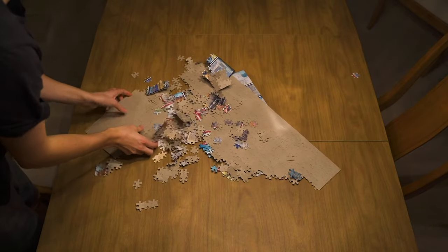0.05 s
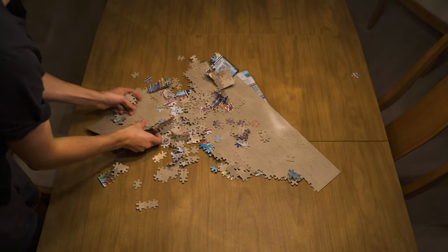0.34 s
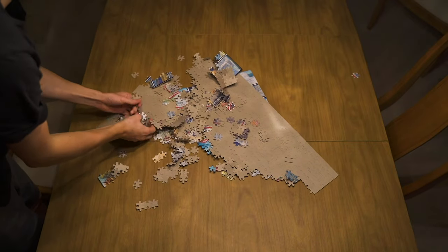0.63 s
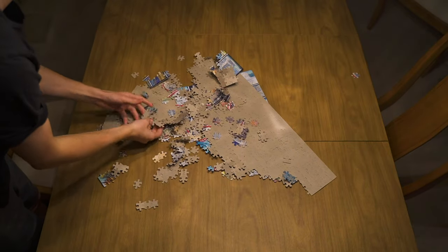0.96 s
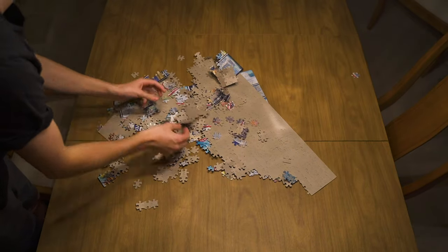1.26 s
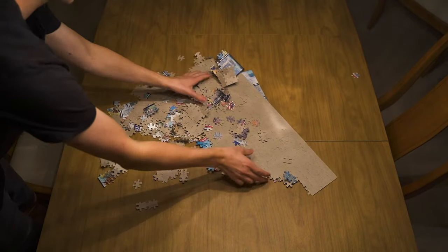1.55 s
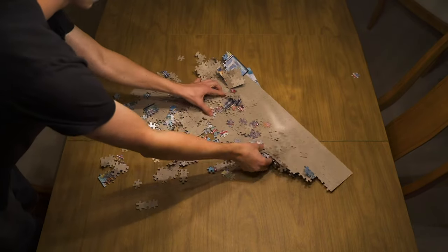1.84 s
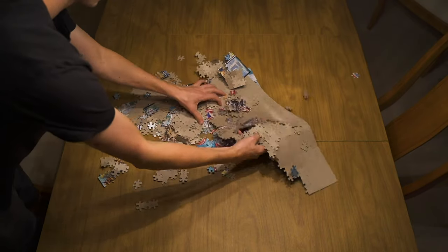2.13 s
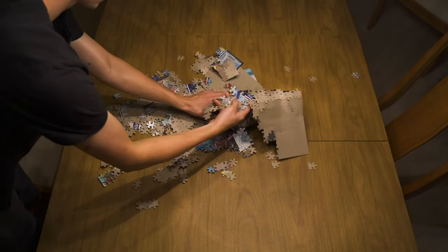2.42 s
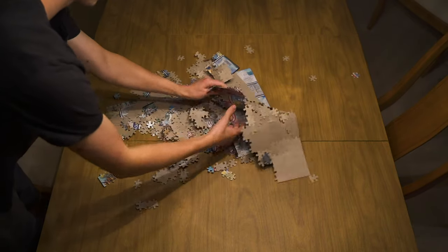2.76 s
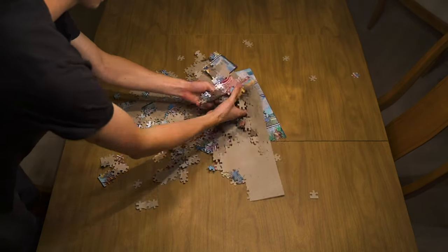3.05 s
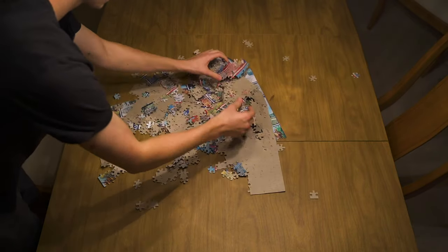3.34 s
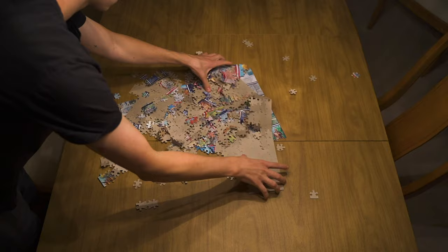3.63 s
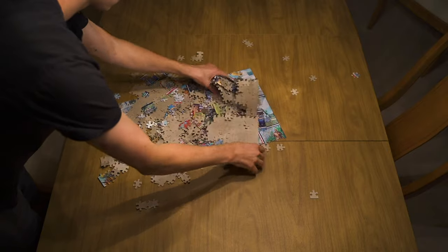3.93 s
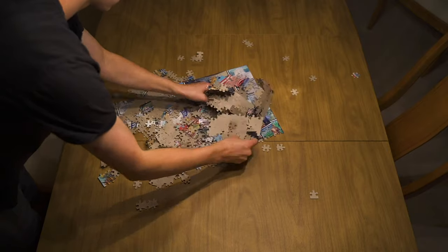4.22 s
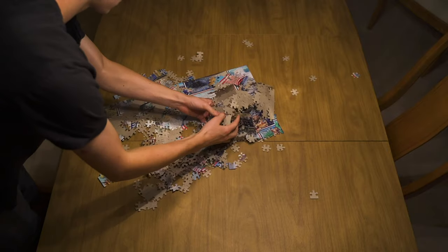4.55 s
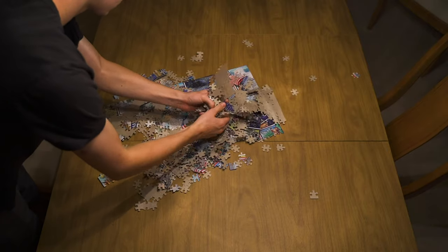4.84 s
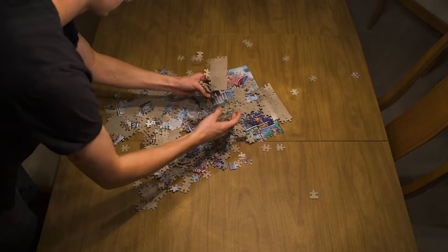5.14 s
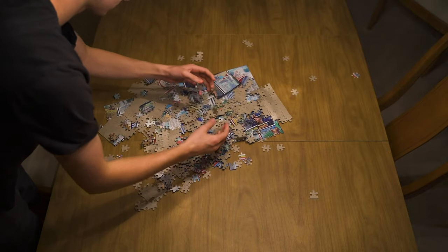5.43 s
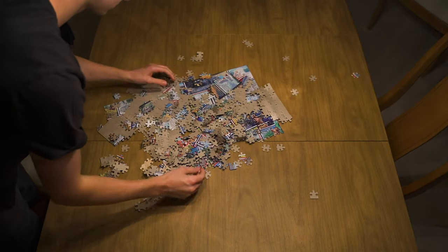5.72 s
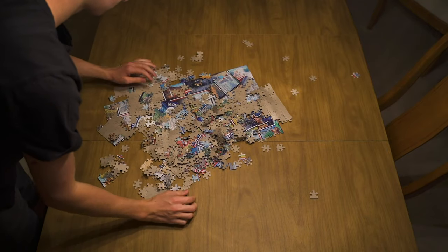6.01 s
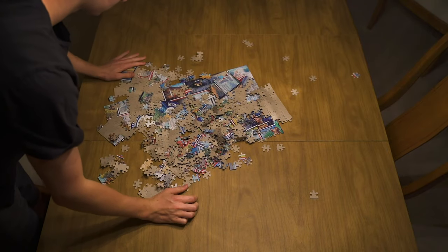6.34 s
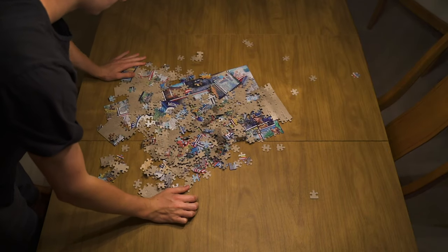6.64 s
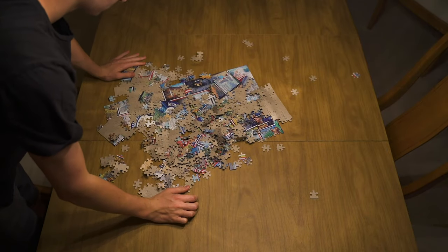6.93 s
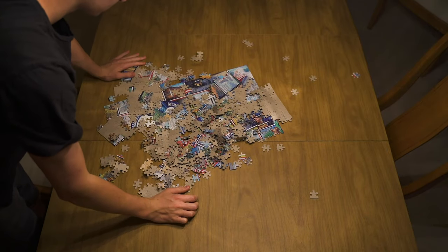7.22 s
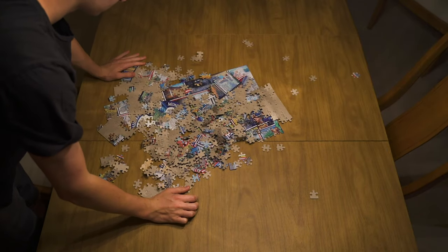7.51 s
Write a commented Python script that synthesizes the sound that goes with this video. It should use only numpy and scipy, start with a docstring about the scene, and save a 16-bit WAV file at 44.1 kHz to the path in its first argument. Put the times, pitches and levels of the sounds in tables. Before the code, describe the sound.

Hands break up a cardboard jigsaw on a wooden table, heard close in a small, live room with faint steady air. From the start, slabs drag over the wood in short bursts while loose pieces rustle and click, with a sharper clack at about 1.1 seconds. After a brief easing around 1.6 seconds, the handling grows dense and louder. Sections crumble, joints snap and pieces rattle down, with a slab flopping at 2.5 seconds and a strong crumbling clatter near 2.9. A sharp clack and thud land at 3.6 seconds, followed by more shoving, scraping and another flop around 4.3. The table booms softly under the hands. Bright rustling and clacks continue until about 5.7 seconds, and a last short rattle comes just after 6. A small hollow knock follows at 6.6 seconds, then a few soft finger taps around 7, leaving only room air.

```python
"""Cardboard drags, clatters and rustles on wood: two hands break up a finished jigsaw in a small, live room.
Shoved slabs judder over the table, loose pieces clack and chink, cut edges scrape: swarms of tiny contacts.
Pieces land, slabs crumble and flop, joints snap: each a blow and a short rattle, coloured by the table top.
The table booms softly under the hands, which come to rest with a few soft taps. Faint room air throughout."""
import sys
import numpy as np
from scipy import signal
from scipy.fft import rfft, irfft, next_fast_len
from scipy.io import wavfile
from scipy.ndimage import map_coordinates

SR = 44100
rng = np.random.default_rng(int(sys.argv[2]) if len(sys.argv) > 2 else 0)


def int16_out(signal):
    """Quantize to a 16-bit WAV file."""
    q = np.round(np.clip(np.atleast_2d(signal).T, -1, 1) * 32767)
    wavfile.write(sys.argv[1], SR, q.astype(np.int16))


N = 333989

# spectra of struck wood, cut edges and cardboard: f/Hz, level/dB
WOOD_SPECTRUM = [(30, -49), (160, -30), (220, -11.5), (310, -10), (380, -3), (520, 0.5), (750, -7),
                 (1100, -6.5), (2000, -14), (5000, -49.5)]
EDGE_SPECTRUM = [(500, -60), (1800, -7), (2800, -4), (4200, -6), (5300, 0), (7000, -4.5), (8500, -6.5),
                 (10500, -6), (12500, -9.5), (16000, -10.5)]
CARD_SPECTRUM = [(60, -25), (160, -21.5), (330, -8.5), (800, -3), (2000, 6), (2800, 7), (4500, 12.5),
                 (14000, -41)]
# hand activity in the heap: t/s, sliding on wood/dB, rubbing of pieces/dB
ACTIVITY = [(0, -37.5, -52.5), (0.3, -34, -42), (0.5, -39, -45.5), (1.33, -37, -51.5), (1.42, -41.5, -70),
            (1.68, -56, -76), (1.84, -34.5, -45), (2.65, -34, -44), (3.05, -33.5, -38), (3.45, -39, -32.5),
            (3.79, -29, -46.5), (4.2, -31.5, -35.5), (4.85, -36.5, -36.5), (5.68, -54, -41),
            (5.8, -50.5, -68), (6.1, -48, -44.5), (6.28, -49.5, -71), (6.8, -60, -85)]
CHINK_HZ, CHINK_SPREAD_OCT = 5433, 0.13  # ring of one piece, scatter between pieces
TOP_HZ = 16000


def amp(db):
    """dB to gain."""
    return 10 ** (np.asarray(db) / 20)


def unit(x):
    """x at rms 1."""
    return x / np.sqrt(np.mean(x ** 2) + 1e-20)


def along(points, hz):
    """Interpolate (f/Hz, value) points on a log axis."""
    f, v = np.transpose(points)
    return np.interp(np.log(hz + 1), np.log(f + 1), v)


def activity_db():
    """Sliding and rubbing levels per sample, falling 100 dB/s after the last row."""
    times_s, *levels_db = np.transpose(ACTIVITY)
    t = np.arange(N) / SR
    return [np.interp(t, times_s, db) - 100 * np.maximum(t - times_s[-1], 0) for db in levels_db]


def strokes(rows, attack_s, release_db_per_s):
    """Hand strokes swell, hold and die away; one gain curve per level column."""
    t = np.arange(N) / SR
    power = np.zeros((len(rows[0][2:]), N))
    for start_s, length_s, *levels_db in rows:
        near = slice(*np.searchsorted(t, [start_s, start_s + length_s + .5]))
        age_s = t[near] - start_s
        release = amp(-release_db_per_s * np.maximum(age_s - length_s, 0))
        envelope = np.minimum(age_s / attack_s, 1) * release
        power[:, near] += np.outer(amp(levels_db), envelope) ** 2
    return np.sqrt(power)


def wobble(rate_hz):
    """Smooth random curve."""
    knots = rng.standard_normal(int(N * rate_hz / SR) + 4)
    return map_coordinates(knots, [np.arange(N) * rate_hz / SR])


def response(gain_db, size=8192):
    """Minimum-phase impulse response of energy 1, shaped by gain_db(hz)."""
    cepstrum = irfft(np.log(amp(gain_db(np.fft.rfftfreq(size, 1 / SR)))))
    cepstrum[1:size // 2] *= 2
    cepstrum[size // 2 + 1:] = 0
    h = irfft(np.exp(rfft(cepstrum)))
    return h / np.linalg.norm(h)


def body(spectrum, size=8192):
    """Impulse response of a body with this spectrum."""
    return response(lambda hz: along(spectrum, hz), size)


def through(x, h):
    """x convolved with h, cut to the length of x."""
    return signal.fftconvolve(x, h, axes=-1)[..., :x.shape[-1]]


def diffuse(size):
    """Stereo noise from all sides: alike in the bass, unrelated in the treble."""
    # diffuse field: f/Hz, left-right coherence
    coherence = [(25, 0.97), (70, 0.93), (330, 0.98), (700, 0.76), (1400, 0.42), (2800, 0), (5500, 0),
                 (13000, 0)]
    angle = np.arccos(np.clip(along(coherence, np.fft.rfftfreq(size, 1 / SR)), -1, 1)) / 2
    mid, side = rfft(rng.standard_normal((2, size))) * [np.cos(angle), np.sin(angle)]
    return irfft(np.array([mid + side, mid - side]), size)


def room(wet_db, early_db=3, early_s=0.01, build_s=0.0033, size=18000):
    """Stereo path from one spot on the table: direct sound, strong near walls, tail."""
    # reverberation time: f/Hz, t60/s
    decay = [(150, 0.46), (550, 0.32), (1400, 0.38), (5000, 0.4), (14000, 0.33)]
    hz, frame_s, spectra = signal.stft(diffuse(size), SR, nperseg=256)
    spectra = spectra * amp(-60 * frame_s / along(decay, hz)[:, None])
    tail = signal.istft(spectra, SR)[1][:, :size]
    t = np.arange(size) / SR
    tail = tail * (1 + amp(early_db) * np.exp(-t / early_s)) * (1 - np.exp(-t / build_s))
    path = amp(wet_db) * tail / np.linalg.norm(tail[0])
    path[[0, 1], rng.integers(2, size=2)] += 1  # direct sound, 0 or 1 sample late per side
    return path / np.linalg.norm(path[0])


def tint(depth_db, count=16):
    """Broad random colour of one group of pieces."""
    spectrum = np.column_stack([np.geomspace(600, TOP_HZ, count), depth_db * rng.standard_normal(count)])
    return body(spectrum, size=512)


def roaming(x, wet_db, tint_db, size=2000, count=16):
    """Moving hands: each short block of x comes from a random spot on the table."""
    spots = [through(room(wet_db), tint(tint_db)[None]) for _ in range(count)]
    out = np.zeros((2, N + SR))
    for start in range(0, N, size):
        heard = signal.fftconvolve(x[None, start:start + size], spots[rng.integers(count)], axes=1)
        out[:, start:start + heard.shape[1]] += heard
    return out[:, :N]


def table_top_db(hz, low_cut_hz=170):
    """The table top resonates; the deep bass is rolled off."""
    # resonances: f/Hz, width/Hz, level/dB
    modes = [(385, 11, 3), (448.4, 26, 8), (539.4, 22, 3.5), (627.7, 32, 9), (703.5, 60, 8),
             (767.5, 32, 6.5), (897, 50, 5), (1038, 15, 4), (1320, 84, 2), (1620, 31, 0)]
    peaks_db = sum(db / (1 + (2 * (hz - mode_hz) / width_hz) ** 2) for mode_hz, width_hz, db in modes)
    return peaks_db - 10 * np.log10(1 + (low_cut_hz / (hz + 1)) ** 2)


def contacts(rate_hz, spread_db):
    """Tiny contacts at random times, of widely varying strength."""
    chance, strength, sign = rng.random(N), rng.standard_normal(N), rng.choice([-1, 1], N)
    return unit((chance < rate_hz / SR) * sign * amp(spread_db * np.minimum(strength, 2)))


def ping(hz, cycles, t):
    """Ring of a piece, down to 1/e after the given cycles."""
    return np.sin(2 * np.pi * hz * t) * np.exp(-hz * t / cycles)


def pieces(rate_hz, spread_db, centre_hz, spread_oct, cycles, size=400):
    """Contacts that each ring one piece at its own pitch."""
    blows = contacts(rate_hz, spread_db)
    at = np.flatnonzero(blows)[:, None]
    hz = centre_hz * 2 ** (spread_oct * rng.standard_normal(N)[at])
    grains = blows[at] * ping(hz, cycles, np.arange(size) / SR)
    return unit(np.bincount((at + np.arange(size)).ravel(), grains.ravel(), N)[:N])


def shuffling():
    """Slabs judder over the wood, loose pieces clack and chink, cut edges catch; all in small bursts."""
    # slabs shoved over wood, and a last soft brush of hand or sleeve: t/s, length/s, drag/dB, clatter/dB
    slides = [(-.015, 0.037, -22.5, -33.5), (0.158, 0.092, -28.5, -34), (0.724, 0.067, -33, -34.5),
              (1.21, .13, -40, -38.5), (1.472, 0.073, -36.5, -51), (1.69, .08, -38, -52),
              (1.755, 0.06, -31.5, -47), (1.848, 0.061, -29.5, -28.5), (2.065, .09, -33, -36),
              (2.507, 0.12, -42, -25.5), (2.915, 0.051, -24.5, -20), (3.13, 0.054, -30, -28.5),
              (3.237, 0.11, -33.5, -27), (3.69, 0.11, -35, -44), (3.904, 0.088, -27, -28.5),
              (4.02, 0.12, -24.5, -25), (4.44, 0.14, -31, -26.5), (4.674, .11, -30.5, -26.5),
              (5.05, .14, -33.5, -38), (5.41, 0.052, -25.5, -50.5), (5.575, .13, -34, -50),
              (5.965, 0.18, -35.5, -30), (6.45, 0.059, -54, -47), (6.807, 0.04, -43.5, -55)]
    # bright rubs of pieces, and the closing finger tap's faint tick: t/s, length/s, chink/dB, scrape/dB
    rubs = [(.13, 0.16, -31.5, -38.5), (.77, 0.054, -37, -42), (.875, 0.017, -33, -38),
            (.98, 0.084, -39.5, -56), (1.122, 0.038, -26.5, -49), (1.21, .06, -44, -46),
            (1.45, 0.097, -34, -41), (1.85, 0.083, -46, -34.5), (2.11, 0.022, -36, -39.5),
            (2.18, 0.029, -32, -37), (2.695, 0.026, -49, -47), (2.84, 0.057, -46, -32.5),
            (2.92, 0.04, -28, -26.5), (3.25, 0.11, -38, -45), (3.49, .2, -32, -36),
            (3.812, 0.016, -27, -40), (3.87, 0.096, -32.5, -36.5), (4.05, 0.09, -37, -38.5),
            (4.44, 0.19, -39, -39.5), (4.71, 0.081, -27, -37.5), (4.87, 0.063, -35.5, -39),
            (5.07, .12, -36, -38.5), (5.385, 0.081, -25, -30), (5.568, 0.065, -31, -34),
            (5.645, 0.035, -26, -37.5), (5.901, 0.011, -28.5, -46), (5.97, .15, -40.5, -46.5),
            (6.565, 0.025, -59, -53.5)]
    sliding_db, rubbing_db = activity_db()
    scraping_db = 0.65 * rubbing_db - 15  # edges scrape even in light stirring
    slide_gains = strokes(slides, attack_s=0.0083, release_db_per_s=290)
    rub_gains = strokes(rubs, attack_s=0.013, release_db_per_s=320)
    drag_gain, clatter_gain = np.hypot(amp([sliding_db, sliding_db + 2.5]), slide_gains)
    chink_gain, scrape_gain = np.hypot(amp([rubbing_db, scraping_db]), rub_gains)
    shared_flutter = wobble(rate_hz=60)

    def bursts(x, db, depth_db):
        flutter = shared_flutter + 0.83 * wobble(rate_hz=70)
        return amp(db) * unit(x * amp(depth_db * flutter))

    drag = through(contacts(rate_hz=740, spread_db=4.5), body(WOOD_SPECTRUM))
    loose = pieces(rate_hz=480, spread_db=6, centre_hz=1428, spread_oct=0.41, cycles=1.18)
    clatter = through(loose, body(CARD_SPECTRUM))
    scrape = through(contacts(rate_hz=4500, spread_db=5.5), body(EDGE_SPECTRUM))
    chink = pieces(rate_hz=700, spread_db=7.5, centre_hz=CHINK_HZ,
                   spread_oct=CHINK_SPREAD_OCT, cycles=10.3)
    low = drag_gain * bursts(drag, db=-3.5, depth_db=1.5)
    low += clatter_gain * bursts(clatter, db=-4, depth_db=0.45)
    high = chink_gain * bursts(chink, db=-1.5, depth_db=2.4)
    high += scrape_gain * bursts(scrape, db=5, depth_db=1.1)
    return roaming(low, wet_db=4, tint_db=0.97) + roaming(high, wet_db=-1, tint_db=2)


def table_boom():
    """The whole table booms softly under moving hands, more when they lean on it."""
    # table boom: f/Hz, level/dB
    spectrum = [(40, -18), (85, -15), (104, -2), (114, 5), (135, -36), (220, -29.5)]
    # weight on the table: t/s, length/s, level/dB
    leans = [(1.67, 0.17, -55.5), (1.97, .1, -49), (2.15, 0.063, -52), (3.56, .1, -52), (4.07, 0.14, -46),
             (5.56, 0.11, -52.5), (6.88, 0.054, -55)]
    sliding_db, _ = activity_db()
    weight = np.hypot(amp(sliding_db - 28), strokes(leans, attack_s=0.011, release_db_per_s=250))
    return weight * unit(through(rng.standard_normal(N), body(spectrum)))


def room_air(level_db=-52):
    """Still room air: steady diffuse noise."""
    # room air: f/Hz, level/dB
    spectrum = [(25, -29), (90, -2), (170, -6.5), (280, -1), (490, 0.5), (700, -3.5), (1000, -3.5),
                (2000, -8.5), (4000, -13), (16000, -20.5)]
    noise = diffuse(next_fast_len(N))[:, :N]
    return amp(level_db) * unit(through(noise, body(spectrum)[None]))


def impacts(rows, first_db, rattle_s, count, wet_db, ring_db=-4, crunch_s=0.00077, lag_s=.0016):
    """Each blow clacks the card, thuds the table and ticks an edge; count more contacts follow."""
    size = 18000
    out = np.zeros((2, N + size))
    wood, edges, card = body(WOOD_SPECTRUM), body(EDGE_SPECTRUM), body(CARD_SPECTRUM)
    t = np.arange(len(card)) / SR
    for start_s, db, clack_hz, thud_db, tick_db, rattle_db in rows:
        delay_s = np.minimum(rattle_s * rng.gamma(2, size=count), .1)
        strength = rng.standard_normal(count)
        hits = np.zeros(size)
        hits[(delay_s * SR).astype(int)] = amp(rattle_db) * strength / np.linalg.norm(strength)
        hits[0] = amp(first_db)
        clack = through(ping(clack_hz, cycles=0.67, t=t), card)
        crunch = through(rng.standard_normal(len(t)) * np.exp(-t / crunch_s), edges)  # cut fibres
        chink = ping(CHINK_HZ * 2 ** (CHINK_SPREAD_OCT * rng.standard_normal()), cycles=6, t=t)
        tick = unit(crunch) + amp(ring_db) * unit(chink)
        blow = amp(7.5) * unit(clack) + amp(thud_db + 21) * unit(wood) + amp(tick_db + 22) * unit(tick)
        rattled = through(hits, blow / np.sqrt(len(blow)))
        heard = amp(db) * through(rattled[None], room(wet_db))
        out[:, round((start_s + lag_s) * SR):][:, :size] += heard
    return out[:, :N]


def clacks(thud_db=-22):
    """Light clacks with little thud: pieces land, and at the end fingers tap the table."""
    # light clacks: t/s, level/dB, clack f/Hz, tick/dB, rattle/dB
    events = [(0.323, -7.5, 1140, -19.5, -21), (0.786, -12, 1250, -32, -5), (0.987, -10, 1430, -23, -5),
              (1.127, -2.5, 2040, -16.5, -16), (1.207, -7.5, 1720, -25, -14),
              (1.303, -13.5, 1850, -30, -11), (1.65, -18, 1500, -24, -3), (1.769, -12.5, 855, -16.5, -3),
              (2.012, -8, 1120, -32, -12), (2.033, -11.5, 1080, -35, 0), (2.068, -4.5, 1120, -30, -0.5),
              (2.124, -2, 1250, -22, -3.5), (2.188, -5, 1140, -30, -4), (2.294, -5, 1340, -20.5, -1),
              (2.381, -5.5, 1420, -24, -13), (2.514, -7.5, 840, -32, -8), (2.706, -4, 1590, -20.5, -11),
              (3.274, -13, 1520, -14.5, 4), (3.49, -8, 2030, -36, -2.5), (3.583, 2.5, 1510, -27, -21),
              (3.627, -8, 1660, -24, -8), (3.708, -5.5, 1180, -20, -7), (4.051, -5.5, 1010, -24, 2),
              (4.444, -3, 1500, -32, -6), (4.699, -9, 1410, -18, -15), (5.465, -12, 980, -23, -8),
              (5.572, -2.5, 1430, -34, -7), (6.293, -14.5, 1620, -31, -4), (6.895, -17, 1070, -48, 4.5),
              (7.037, -23, 1350, -28, 4.5)]
    rows = [(s, db, hz, thud_db, tick_db, rattle_db) for s, db, hz, tick_db, rattle_db in events]
    return impacts(rows, first_db=1.5, rattle_s=.007, count=5, wet_db=4.5)


def rattles(rattle_db=0):
    """Dense soft rattles: slabs crumble, and at the end fingers drop onto the table."""
    # dense rattles: t/s, level/dB, clack f/Hz, thud/dB, tick/dB
    events = [(0.53, -13.5, 1380, -16, -11), (1.889, -14, 970, -4.5, -20), (2.193, -8.5, 1060, -21, -19),
              (2.434, -3, 1440, -25, -21), (2.599, -5.5, 1880, -19.5, -24.5), (2.719, -9, 1510, -31, -8.5),
              (2.884, -8, 1580, -10, -4.5), (2.935, 1.5, 1690, -17, -20), (3.583, -6, 1440, -12.5, -13),
              (5.289, -24.5, 880, -20, 4), (5.418, -18.5, 1340, -7, 2.5), (6.062, -7, 1350, -37, -26),
              (6.18, -10, 1420, -30, -27), (6.369, -28.5, 1400, -18, -10), (6.895, -18.5, 1150, -5, -31),
              (7.046, -27, 1320, -9, -18)]
    rows = [(*row, rattle_db) for row in events]
    return impacts(rows, first_db=-8.5, rattle_s=.009, count=30, wet_db=-0.5)


def flops(clack_hz=1300, thud_db=0.5, tick_db=-22, rattle_db=-7):
    """A large slab flops down and thuds the table."""
    # slab drops: t/s, level/dB
    drops = [(0.675, -30.5), (1.128, -23), (2.069, -20.5), (2.498, -10.5), (2.839, -15), (3.592, -15),
             (3.817, -19.5), (4.29, -17.5), (4.999, -24.5)]
    rows = [(*row, clack_hz, thud_db, tick_db, rattle_db) for row in drops]
    return impacts(rows, first_db=-0.5, rattle_s=.007, count=5, wet_db=3)


def ticks(clack_hz=1300, thud_db=-39, tick_db=2, rattle_db=1):
    """Bright ticks: joints snap, and a last faint tick as the hands settle."""
    # bright ticks: t/s, level/dB
    events = [(1.555, -24.5), (2.836, -19.5), (3.817, -19.5), (5.725, -23), (5.912, -34), (7.046, -39)]
    rows = [(*row, clack_hz, thud_db, tick_db, rattle_db) for row in events]
    return impacts(rows, first_db=-2, rattle_s=.005, count=8, wet_db=-0.5, ring_db=-9.5, crunch_s=0.00081)


def hollow_tap(start_s=6.5785, tick_db=-27):
    """The hands settle with a hollow knock: light tick, brief ring, faint deep bump."""
    # knock modes: f/Hz, level/dB, t60/s
    modes = [(660, -29, .035), (1290, -24, .028), (1420, -30, .025)]
    t = np.maximum(np.arange(N) / SR - start_s, 0)

    def mode(hz, db, t60_s):
        return amp(db - 60 * t / t60_s) * np.sin(2 * np.pi * hz * t)

    knock = sum(mode(*row) for row in modes)
    knock[round(start_s * SR)] += amp(tick_db)
    bump = mode(hz=36, db=-44, t60_s=.12)
    return through(knock[None], room(wet_db=1)) + bump


def scene():
    """Puzzle handling coloured by the table top, plus tap, boom and air."""
    handling = shuffling() + clacks() + ticks() + flops() + rattles()
    balance = amp([[-.25], [.25]])
    puzzle = through(handling, response(table_top_db)[None]) * balance
    return puzzle + room_air() + hollow_tap() + table_boom()


def record(dry):
    """Brick-wall low-pass at TOP_HZ."""
    size = next_fast_len(N + SR // 2)
    passband = np.fft.rfftfreq(size, 1 / SR) < TOP_HZ
    return irfft(rfft(dry, size) * passband, size)[:, :N]


dry = scene()
out = record(dry)
int16_out(out)
```